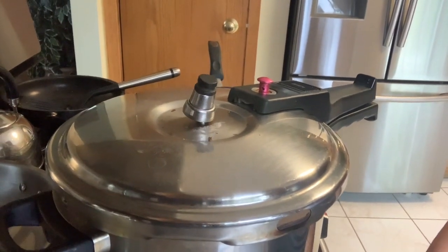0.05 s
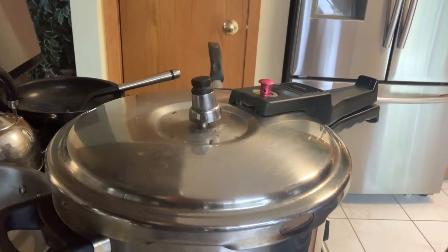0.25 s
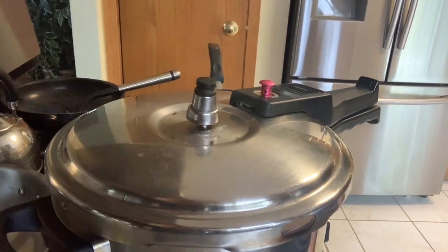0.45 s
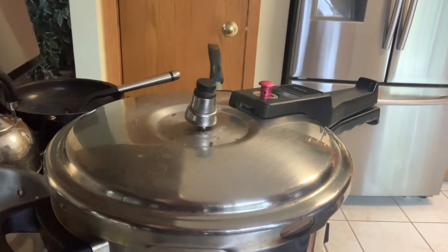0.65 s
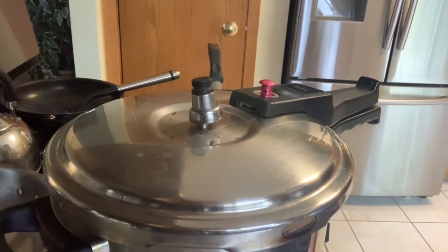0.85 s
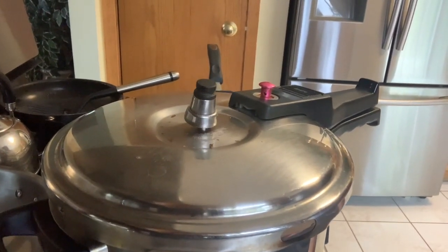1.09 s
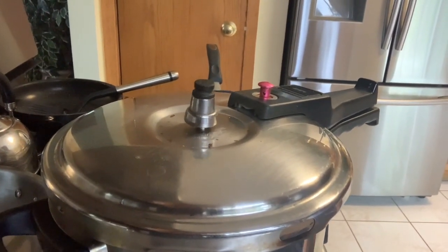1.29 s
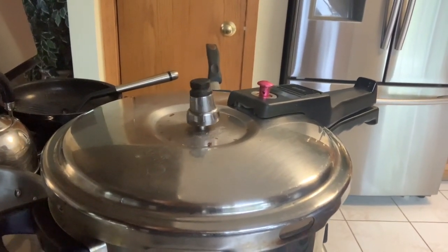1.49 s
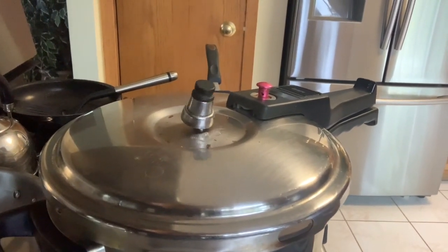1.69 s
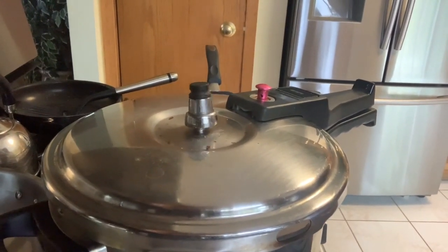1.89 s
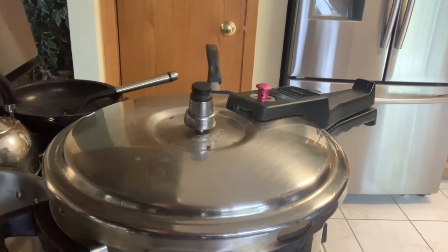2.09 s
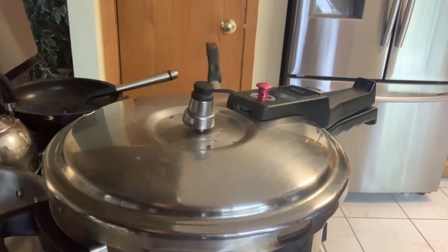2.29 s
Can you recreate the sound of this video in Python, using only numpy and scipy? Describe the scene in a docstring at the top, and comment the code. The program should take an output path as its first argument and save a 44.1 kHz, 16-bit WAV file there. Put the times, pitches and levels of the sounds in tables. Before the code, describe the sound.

A pressure cooker, close in stereo in a kitchen: its vent weight rocks three times a second throughout, puffing bright, whistly steam on each side, with soft lid bumps and a metallic clack every third of a second. At 0.44 s a water drop spits sharply; at 0.53 s a stronger clack and dull thud bloom into low room resonance. Simmer and faint rumble continue; the last puff, near 2.4 s, is strongest.

```python
"""A pressure cooker in a kitchen, heard from close by in stereo, over a low rumble and a simmer.
The weight on the vent rocks three times a second: shaped noise puffs out on each side, whistling in the hollow weight.
Damped modes sound as it bumps the lid softly; a noise burst with ringing modes clacks at the end of one swing.
A drop of water then spits once in the vent, a noise crack with splatter and spray.
A dull thud of swelling noise bands follows, and the low resonances of the room build up and die away after it."""
import sys
import numpy as np
from scipy import signal
from scipy.fft import rfft, irfft
from scipy.io import wavfile
from scipy.ndimage import uniform_filter1d

SR = 44100
rng = np.random.default_rng(int(sys.argv[2]) if len(sys.argv) > 2 else 0)


def file_out(sig):
    """Save sig as 16-bit WAV at sys.argv[1]."""
    # one column per channel
    cols = np.atleast_2d(sig).T
    # limit, then scale
    lim = np.clip(cols, -1, 1)
    pcm = np.round(lim * 32767).astype(np.int16)
    wavfile.write(sys.argv[1], SR, pcm)


N = 103414

THUD_S = 0.532


def steam(room):
    """Jet noise: turbulent flow gated by the tilting weight, coloured by the resonances of its hollow."""
    # puffs of steam, times to 1/e of the power: peak_s, level_db (relative), rise_s, fall_s
    puffs = [(0.1, -28, 0.048, 0.03), (0.227, -26.5, 0.034, 0.042), (0.439, -31, 0.061, 0.074),
             (0.561, -25.5, 0.033, 0.036), (0.766, -29.5, 0.073, 0.032), (0.901, -23.5, 0.029, 0.032),
             (1.09, -29.5, 0.07, 0.03), (1.222, -23, 0.03, 0.034), (1.335, -34.5, 0.038, 0.048),
             (1.428, -29, 0.059, 0.028), (1.556, -25, 0.028, 0.04), (1.748, -29, 0.051, 0.026),
             (1.878, -26, 0.035, 0.038), (2.07, -28.5, 0.044, 0.036), (2.207, -25, 0.031, 0.042),
             (2.390, -18, 0.031, 0.025)]
    # power density of the jet: frequency_hz, density_db (relative, per Hz)
    jet_colour = [(150, -22), (400, -19), (900, -8.5), (1300, -8.5), (1600, -5), (2200, -5), (2800, -4.5),
                  (3400, 0), (4100, 6), (4700, -1), (5100, -2.5), (6000, -3.5), (7300, -1.5), (8200, -8.5),
                  (9500, -1), (11000, -2.5), (12200, -6), (14000, -2.5), (15400, 0.5), (16000, -0.5)]
    # whistling resonances of the hollow weight: frequency_hz, width_hz, added_gain_db (over the jet)
    hollow_modes = [(2095, 26, 8.5), (2145, 43, -4), (2760, 9.7, 10), (4030, 27, 2.5), (4480, 21, 13),
                    (4810, 69, 17), (5160, 40, -3), (4870, 34, 10), (5320, 29, 9.5), (5610, 78, 5),
                    (6170, 43, 9.5), (6520, 44, 1.5), (6740, 22, 6), (7420, 39, 0)]
    leak_db, puff_exponent, jet_db = -52, 2.07, -3
    flutter_db, flutter_hz = 1.21, 71
    droplets_per_s, droplet_db, droplet_scatter_db = 18, 15.5, 2

    t = np.arange(N) / SR
    power = amp(leak_db) ** 2
    for peak, db, rise, fall in puffs:
        distance = np.abs((t - peak) / np.where(t < peak, rise, fall))
        power = power + amp(db) ** 2 * np.exp(-distance ** puff_exponent)
    flutter = amp(flutter_db * waver(flutter_hz))

    droplet_gain = amp(droplet_db + droplet_scatter_db * noise())
    droplets = (rng.random(N) < droplets_per_s / SR) * droplet_gain
    phase, _, _ = stereo_image()
    jet = spread(noise, room) + through(droplets, phase)

    hollow = 1
    for hz, width, db in hollow_modes:
        hollow = hollow + amp(db) / (1 + (2 * (bins() - hz) / width) ** 2)
    return amp(jet_db) * through(jet * np.sqrt(power) * flutter, colour(jet_colour) * hollow)


def knocks(room):
    """Impact: a hard contact with a rattling tail excites modes of the lid and a high tick of the steel weight."""
    # the weight hits the end of its swing, and the 0.5334 s hit sounds with the dull thud: start_s, clack_db,
    # lid_ring_db, high_tick_db (relative)
    hits = [(0.048, -31, -52, -25), (0.3794, -34, -57, -33.5), (0.5334, -22, -20.5, -46),
            (0.6948, -31, -24.5, -53), (1.0264, -27, -35, -24), (1.3512, -33, -25.5, -46),
            (1.6846, -32, -49, -28), (2.0107, -31.5, -49, -23.5), (2.3385, -33.5, -56, -21.5)]
    # power density of the clack: frequency_hz, density_db (relative, per Hz)
    clack_colour = [(150, -20.5), (420, -2.5), (800, -1), (1200, 0), (1650, 5.5), (2200, 4.5), (2800, -10),
                    (3800, 5), (6000, -13.5), (8000, -35.5), (15000, -16.5)]
    # modes of the lid: frequency_hz, level_db (relative), t60_s
    lid_modes = [(1429, -11, 0.087), (1538, -3, 0.068), (1613, -14.5, .06), (1920, -22, 0.055),
                 (2075, -15.5, .06)]
    # modes of the high tick: frequency_hz, level_db (relative), t60_s
    tick_modes = [(11130, -2, 0.025), (11270, 2, 0.012), (8380, -23, 0.021)]
    contact_t60_s, rattle_t60_s, rattle_db, clack_db = 0.048, 0.16, -4.5, -4
    chatter_db, chatter_hz = -0.5, 250
    bounce_s = 0.0017  # from contact to tick

    envelope = 0
    for start, db, _, _ in hits:
        tail = amp(rattle_db) * fade(start, rattle_t60_s)
        envelope = envelope + amp(db) * (fade(start, contact_t60_s) + tail)
    chatter = amp(chatter_db * waver(chatter_hz))
    clack = amp(clack_db) * through(spread(noise, room) * envelope * chatter, colour(clack_colour))

    lid = ring(lid_modes, [(start, lid_db) for start, _, lid_db, _ in hits])
    tick = ring(tick_modes, [(start + bounce_s, tick_db) for start, _, _, tick_db in hits])
    return clack + point(lid + tick, room)


def bumps():
    """Modal excitation: soft contacts ring the lid; where the weight touches decides which group speaks."""
    # low, middle and high group of lid modes, each with rows of: frequency_hz, level_db (relative), t60_s
    mode_groups = [
        [(444.3, 2.5, .11), (547, -8, 0.14)],
        [(692.6, 0.5, 0.075), (950, -13, 0.027)],
        [(760, -6, 0.11), (800, -16, 0.088), (1180, -12, 0.02)],
    ]
    # the weight passes upright or chatters: start_s, low_db, middle_db, high_db (relative, by group)
    contacts = [(.144, -50.5, -46, -46), (.304, -56, -54, -52), (.380, -47.5, -56, -38.5),
                (.490, -52, -40, -40), (.822, -54, -46, -41), (.959, -42, -47, -44),
                (1.142, -40.5, -45.5, -42), (1.280, -47, -38.5, -36.5), (1.364, -50, -46, -35),
                (1.475, -53, -46, -61), (1.616, -45, -39.5, -60), (1.788, -44, -45.5, -62),
                (1.948, -46.5, -40, -43), (2.124, -60, -44.5, -50), (2.276, -47.5, -45, -50),
                (2.315, -46.5, -55, -50)]
    bump_db = -1

    out = 0
    for k, modes in enumerate(mode_groups):
        hits = [(row[0], row[k + 1]) for row in contacts]
        out = out + (-1) ** k * ring(modes, hits)  # the middle group has the opposite sign
    return amp(bump_db) * out


def spit():
    """Transient noise: a sharp crack, slightly later on the right, a brief splatter on the lid and a fading spray."""
    # power density of the spit: frequency_hz, density_db (relative, per Hz)
    spit_colour = [(100, -7), (600, -11), (2000, -12.5), (4000, 1.5), (7000, -3), (10000, 1), (12500, 11.5),
                   (14500, -0.5), (16000, -1)]
    start_s, right_lag_s = 0.4401, 0.000125
    crack_db, crack_t60_s = -1.5, 0.0013
    splatter_db, splatter_t60_s, splatter_lag_s = -15.5, 0.022, 0.0013
    spray_db, spray_t60_s = -23.5, 0.11

    crack = amp(crack_db) * np.sign(noise()) * fade(start_s, crack_t60_s)
    splatter = amp(splatter_db) * fade(start_s + splatter_lag_s, splatter_t60_s)
    spray = amp(spray_db) * fade(start_s, spray_t60_s)
    delay = np.exp(-2j * np.pi * bins() * np.array([[0], [right_lag_s]]))
    wet = np.array([noise(), noise()]) * (splatter + spray)
    return through(through(crack, delay) + wet, colour(spit_colour))


def thud():
    """Frequency-dependent build-up and decay: bands of a dull blow in the room, the lowest swelling slowest."""
    # bands of the thud: low_hz, high_hz, level_db (relative), swell_s, t60_s
    bands = [(46.3, 82, -34.5, 0.048, 0.34), (72, 210, -39.5, 0.043, 0.57), (293, 450, -39.5, 0.0028, 0.63),
             (382, 860, -29, 0.0075, 0.22), (960, 5600, -32, 0.0022, 0.35)]
    age = np.maximum(np.arange(N) / SR - THUD_S, 0)
    out = 0
    for low, high, db, swell, t60 in bands:
        bandpass = signal.butter(3, [low, high], "bandpass", fs=SR, output="sos")
        band = unit(signal.sosfilt(bandpass, noise()))
        build_up = 1 - np.exp(-(age / swell) ** 2)
        out = out + amp(db) * band * build_up * fade(THUD_S, t60)
    return out


def boom():
    """Room resonance: low modes build up after the thud and die away."""
    # low resonances of the room: frequency_hz, level_db (relative), t60_s
    room_modes = [(53.2, -33, 0.65), (111.7, -31, 0.32), (255, -35.5, 0.48), (358, -41, 0.38),
                  (646, -32, 0.37)]
    return point(ring(room_modes, [(THUD_S, 0)], attack_s=0.059), 0)


def background(room):
    """Stationary noise colours: a low rumble of wavering level and the steady simmer of the pot."""
    # level of the low rumble: time_s, level_db
    rumble_level = [(0, -55), (.08, -72), (.17, -53), (.3, -57), (.5, -59), (.8, -60.5), (1.0, -59),
                    (1.18, -63), (1.4, -56.5), (1.6, -70), (1.8, -70), (1.88, -64.5), (2.34, -75)]
    # power density of the rumble: frequency_hz, density_db (relative, per Hz)
    rumble_colour = [(20, -44), (36, -38), (48, -3), (65, 4.5), (85, -11.5), (112, 2.5), (150, -9),
                     (220, -14.5), (500, -20), (2000, -67)]
    # power density of the boiling pot: frequency_hz, density_db (relative, per Hz)
    boil_colour = [(60, -24), (220, -21.5), (330, -4), (430, -1.5), (580, -5.5), (750, -2), (1100, -4.5),
                   (1550, -8.5), (2200, -11), (4500, 5), (7000, -16.5), (12000, -40)]
    boil_db = -46

    level_db = np.interp(np.arange(N) / SR, *np.array(rumble_level).T)
    rumble = amp(level_db) * through(spread(noise, room), colour(rumble_colour))
    simmer = amp(boil_db) * through(spread(noise, room), colour(boil_colour))
    return rumble + simmer


def echoes():
    """Reverberation: decaying noise for lid, stove and walls in each channel, evened out to add no broad colour."""
    near_t60_s, kitchen_t60_s, kitchen_db, first_echo_s = 0.05, 0.4, -12, 0.0012
    near = unit(fade(first_echo_s, near_t60_s))
    far = amp(kitchen_db) * unit(fade(first_echo_s, kitchen_t60_s))
    response = rfft(np.array([near * noise() + far * noise() for _ in range(2)]), 2 * N)
    broad_power = uniform_filter1d(np.abs(response) ** 2, size=900)
    return response / np.sqrt(broad_power)


def stereo_image():
    """Stereo image: phase, likeness and level balance of left and right at each frequency."""
    # left and right channel: frequency_hz, left_lead_rad, likeness (0-1), left_minus_right_db
    image = [(50, .3, .95, 2), (200, 0, .6, 5), (505, 1.1, .45, 3.5), (1110, .8, .5, 3.5),
             (1900, 1.5, .7, 1), (2500, 2.6, .65, 1), (4000, 3.3, .68, 3), (4700, 3.5, .8, .5),
             (5900, 4.8, .58, 0), (7050, 4.8, .6, 1), (7750, 3.2, 1, 0), (9400, 3.1, 1, 0),
             (10000, 2.2, .66, 0), (10650, .8, .6, 0), (11600, 0, 1, 0), (13400, 0, 1, 0),
             (14600, -1.7, .52, 0), (15500, -2.9, .92, 0)]
    side = np.array([[1], [-1]])  # left, right
    phase = np.exp(1j * side * over_hz(image, axis=1) / 2)
    likeness = np.clip(over_hz(image, axis=2), 0, 0.997)
    balance = amp(side * over_hz(image, axis=3) / 2)
    return phase, likeness, balance


def spread(source, room):
    """Partial coherence: a wide source has a core, direct and echoed, and fringes unrelated between left and right."""
    diffuse_echo_db, unrelated_db = -4.5, -1.5
    phase, likeness, balance = stereo_image()
    diffuse = np.sqrt(1 - likeness) * balance
    direct = np.sqrt(likeness) * phase * balance
    core = through(source(), direct + amp(diffuse_echo_db) * diffuse * room)
    fringes = through(np.array([source(), source()]), diffuse)
    return core + amp(unrelated_db) * fringes


def point(x, room):
    """Superposition: the direct sound of a small source and its echoes add in left and right."""
    phase, _, balance = stereo_image()
    return through(x, (phase + room) * balance)


def ring(modes, hits, attack_s=0.0012):
    """Modal synthesis: damped sines with a soft onset, convolved with an impulse at each (start_s, level_db)."""
    t = np.arange(N) / SR
    push = np.zeros(N)
    for start, db in hits:
        push[min(int(start * SR), N - 1)] += amp(db)
    tone = sum(amp(db) * np.sin(2 * np.pi * hz * t) * fade(0, t60) for hz, db, t60 in modes)
    onset = 1 - np.exp(-t / attack_s)
    return through(push, rfft(tone * onset, 2 * N))


def waver(hz):
    """Low-pass noise: random movement up to about this rate, rms 1."""
    return unit(through(noise(), 1 / (1 + (bins() / hz) ** 2)))


def fade(start, t60):
    """Exponential decay: a sudden start, then a fall of 60 dB in each t60."""
    age = np.arange(N) / SR - start
    return (age >= 0) * np.exp(-np.log(1000) * np.clip(age / t60, 0, 10))


def noise():
    """White noise: independent Gaussian samples, rms 1."""
    return rng.standard_normal(N)


def colour(table):
    """Minimum phase: the folded cepstrum makes a causal response of unit mean power from (Hz, dB) points."""
    cepstrum = irfft(np.log(unit(amp(over_hz(table)))))
    cepstrum[1:N] *= 2
    cepstrum[N + 1:] = 0
    return np.exp(rfft(cepstrum))


def through(x, response):
    """Convolution theorem: filter by multiplying the padded spectrum."""
    return irfft(rfft(x, 2 * N) * response)[..., :N]


def over_hz(table, axis=1):
    """Logarithmic frequency scale: one column of a table, joined linearly over log frequency."""
    rows = np.array(table, float)
    return np.interp(np.log(bins()), np.log(rows[:, 0]), rows[:, axis])


def bins():
    """Discrete spectrum: frequencies of the padded transform in Hz, at least 1."""
    return np.maximum(np.fft.rfftfreq(2 * N, 1 / SR), 1)


def amp(db):
    """Decibel law: level to amplitude gain."""
    return 10 ** (np.asarray(db) / 20)


def unit(x):
    """Power normalisation: scale to rms 1."""
    return x / np.sqrt(np.mean(x ** 2))


def scene():
    """Superposition of all sources in the kitchen, in left and right."""
    jet_echo_db, bump_echo_db = -9.5, -4.5
    room = echoes()
    cooker = steam(amp(jet_echo_db) * room) + knocks(room) + spit()
    cooker = cooker + point(bumps(), amp(bump_echo_db) * room)
    return cooker + spread(thud, room) + boom() + background(room)


def record(dry):
    """Band limitation: a high-pass cuts the deepest bass and a steep low-pass cuts the top."""
    low_cut_hz, top_hz = 28, 15600
    high_pass = signal.butter(4, low_cut_hz, "highpass", fs=SR, output="sos")
    low_pass = signal.ellip(10, 0.2, 80, top_hz, fs=SR, output="sos")  # 0.2 dB ripple, 80 dB rejection
    return signal.sosfilt(low_pass, signal.sosfilt(high_pass, dry))


dry = scene()
out = record(dry)
file_out(out)
```